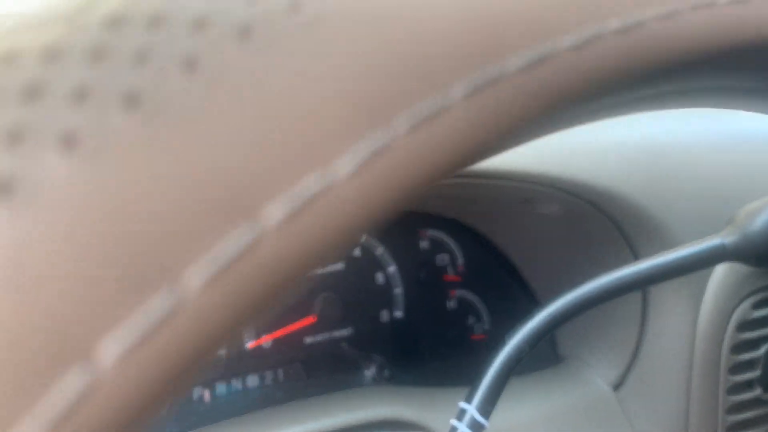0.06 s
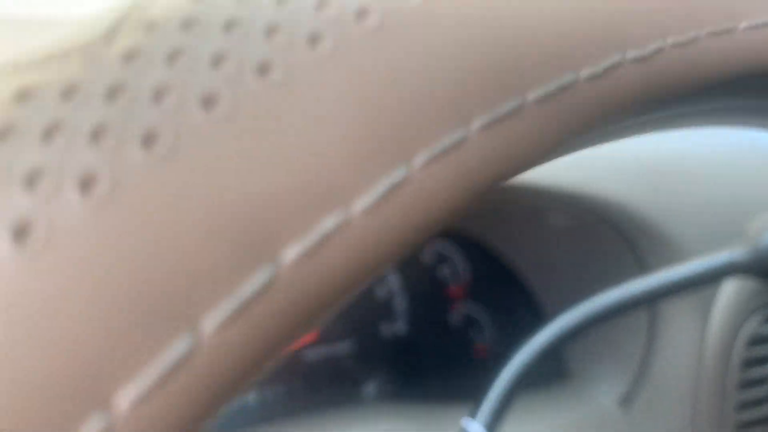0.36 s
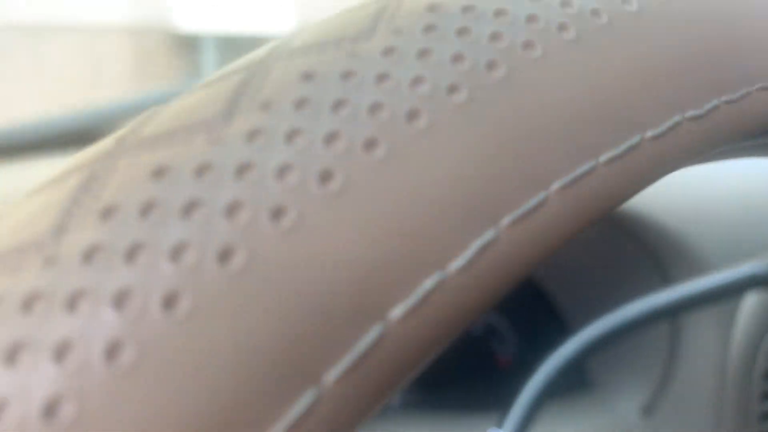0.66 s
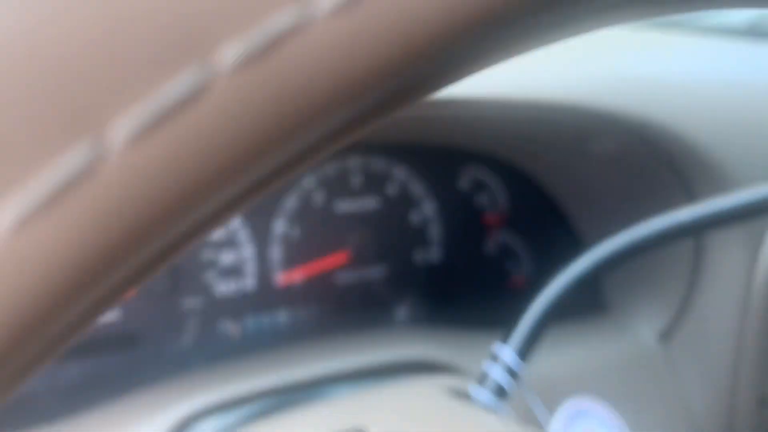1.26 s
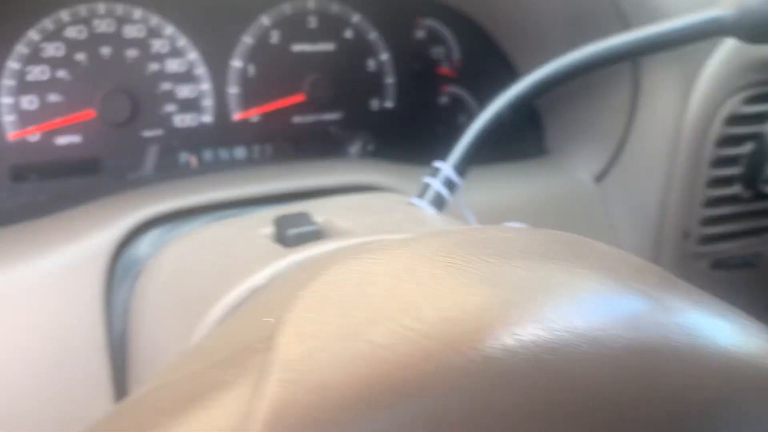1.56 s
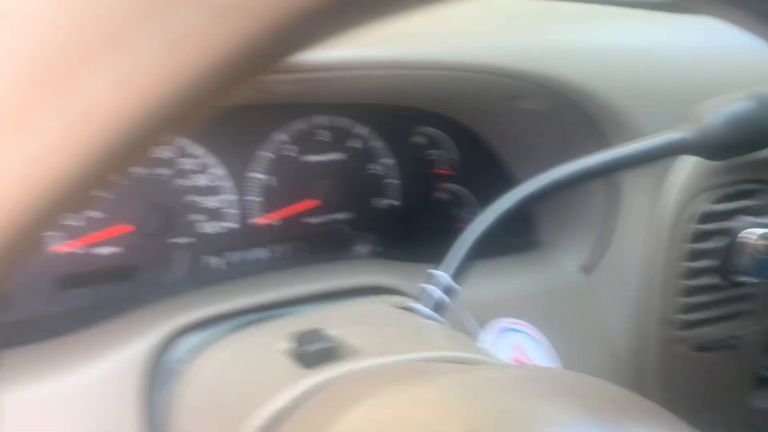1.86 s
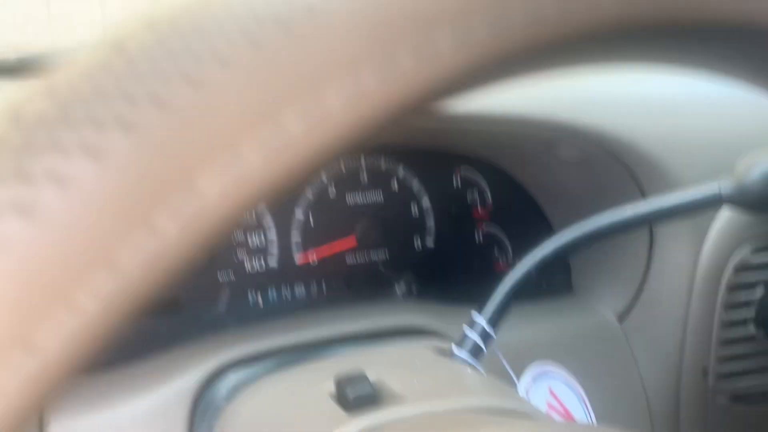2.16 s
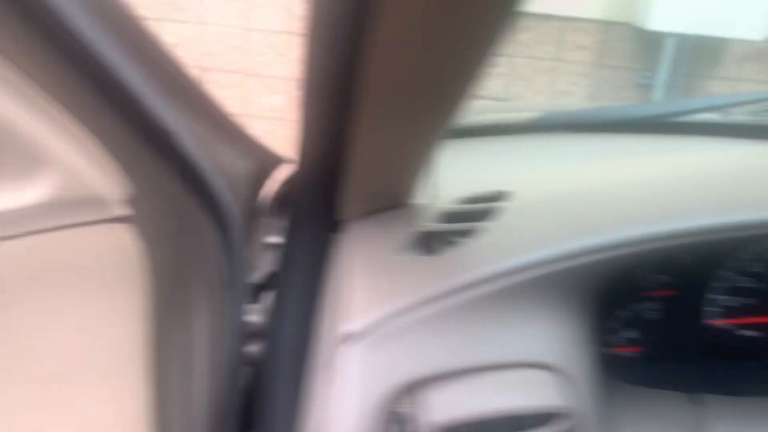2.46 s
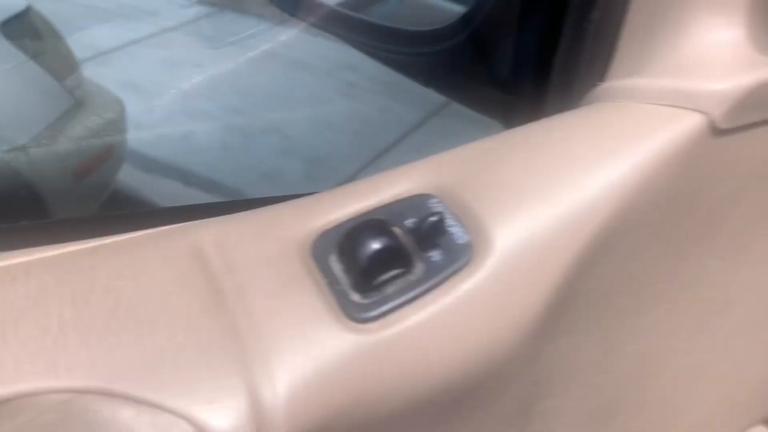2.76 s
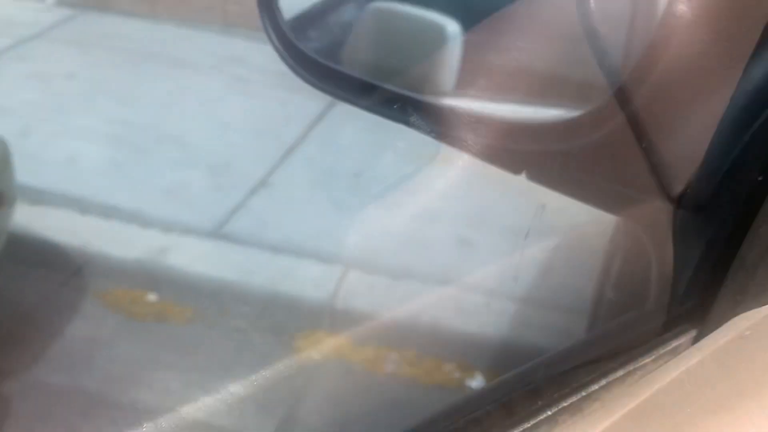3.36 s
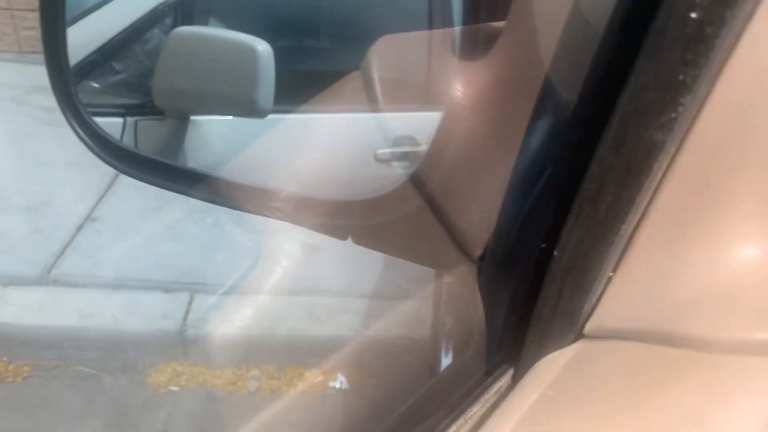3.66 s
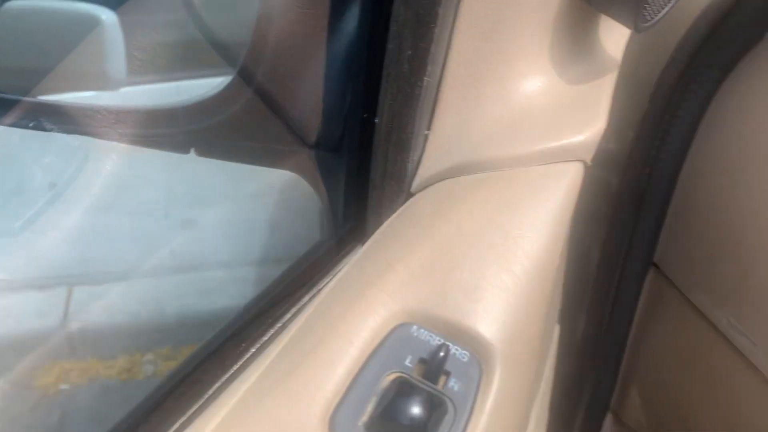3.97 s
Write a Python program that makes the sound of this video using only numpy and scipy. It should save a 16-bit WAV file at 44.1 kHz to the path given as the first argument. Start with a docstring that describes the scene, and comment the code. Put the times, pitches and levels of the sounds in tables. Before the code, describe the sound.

Power door locks clunk twice, close up inside a parked vehicle, the first with a brief springy ring. Light ticks, rubs and a creak come from plastic trim, while a low idle grows louder shortly before the second clunk.

```python
"""Power door locks clunk twice, heard on a stereo pair inside a parked vehicle: the first from across the
cabin, the second near the door. Each stroke is a quick run of metal contacts and a bolt hitting its stop, which
shakes the door panels; the first leaves a small spring ringing. Around them, handling brings light ticks, rubs
and a creak from the plastic trim. Behind it all a low idling rumble fills the cabin, louder and fuller from
about 2.3 s on, as the microphones near the side window."""
import sys
import numpy as np
from scipy import signal
from scipy.fft import rfft, irfft
from scipy.io import wavfile
from scipy.ndimage import uniform_filter1d

SR = 44100
rng = np.random.default_rng(int(sys.argv[2]) if len(sys.argv) > 2 else 0)


def wav_record(signal):
    """Record a signal, one row per channel, as 16-bit PCM in the file named by sys.argv[1]."""
    frames = np.transpose(np.atleast_2d(signal))
    bounded = np.clip(frames, -1, 1)
    # unit amplitude maps onto the largest positive 16-bit level
    quanta = np.round(bounded * 32767).astype(np.int16)
    wavfile.write(sys.argv[1], SR, quanta)


N = 176400
T = np.arange(N) / SR
HZ = np.maximum(np.arange(N // 2 + 1) * SR / N, 1)
SIDES = np.array([[1], [-1]])  # left, right
SHARED_ONLY = np.array([[1], [0]])  # sources have two rows: shared by both microphones, and opposed
LEAD_SAMPLES = 2048  # room for a scrape ahead of a contact
CUTOFF_HZ = 15800
LONGEST_T60_S = .18  # longest ring of a struck mode, keeping the pings short

# Contacts of the lock linkage: start_s, level_db, tilt_db_per_octave
FIRST_CONTACTS = [(1.1187, -21, 4.5), (1.1235, -16, 3.5), (1.128, -16.5, 0), (1.132, -20, -7.5),
                  (1.141, -28.5, -4), (1.162, -30, -3)]
SECOND_CONTACTS = [(2.8165, -24.5, -2), (2.8195, -18, -2.5), (2.8235, -26, -0.5), (2.8295, -22, 0),
                   (2.8335, -31.5, 4.5), (2.838, -24, -0.6), (2.8455, -21, 1), (2.853, -39.5, 5.5),
                   (2.863, -44.5, 7.5)]
# Spectrum of each stroke's contacts: frequency_hz, relative_db
FIRST_COLOUR = [(100, 7), (220, 2), (330, -9), (650, 7), (1000, -1.5), (1700, -1.5), (3200, -5),
                (4200, -13.5), (6700, -4.5), (8500, -10.5), (11500, -8), (15500, -19)]
SECOND_COLOUR = [(100, -2.5), (280, 14), (370, 12), (470, -5.5), (700, -8), (1050, -1.5), (1900, -5),
                 (3700, -7.5), (5200, -16.5), (6700, -6.5), (8200, -18.5), (10500, -6), (15500, -23)]
# The bolt hits its end stop and settles: start_s, level_db, tilt_db_per_octave (above 100 Hz)
FIRST_STOPS = [(1.1266, -3, 1), (1.1463, -22, 1.5)]
SECOND_STOPS = [(2.8171, -21, 7), (2.8255, -10.5, 3), (2.854, -2.5, -9.5)]
# Metal latch modes: pitch_hz, t60_s (capped at LONGEST_T60_S), first_stroke_db, second_stroke_db
LATCH_MODES = [(1247, 0.23, -7, -17), (1414, 0.095, -6.5, -22), (1534, 0.13, -14, -18),
               (1575, 0.17, -13, -30), (1720, 0.097, -10, -7), (1906, 0.15, -18.5, -12.5),
               (1923, .14, -6, -2), (2240, 0.41, -18.5, -12.5), (2560, 0.062, -6.5, 1),
               (2680, 0.1, -21.5, -11), (2870, .14, -11.5, -26), (2930, 0.12, -14.5, -13),
               (3100, 0.094, -23, -28), (3300, 0.1, -10, -34), (3440, 0.1, -13, -28),
               (3620, 0.1044, -22, -11), (3840, .13, -23.5, -12.5), (4600, 0.082, -23.5, -12),
               (6330, .13, -12.5, -12), (6790, .1, -9, -11)]
# Decay of the door's dense ring: frequency_hz, t60_s
DOOR_DECAY = [(100, 0.34), (400, 0.16), (1000, 0.21), (2500, .14), (6000, 0.093), (11000, 0.069),
              (16000, 0.1)]
# Door panel and cabin air modes: pitch_hz, t60_s, first_stroke_db, second_stroke_db
DOOR_MODES = [(51.8, 0.33, -2.5, -27), (83.1, 0.17, -0.5, -21), (106, 0.24, -11.5, -5.5),
              (123.7, 0.2, -15.5, -0.5), (195.2, 0.17, -9, 4.5), (228.7, 0.14, -9.5, -0.5),
              (313, 0.075, -15.5, -0.5), (345.4, .1, -26.5, -10.5), (421, 0.2, -22.5, -33),
              (422, .18, -27, -9.5), (471, 0.18, -14, -25), (572, 0.2, -21.5, -52), (634.4, 0.1, -3, -36),
              (682, 0.14, -23, -21), (750, 0.15, -15.5, -19), (851, 0.14, -19.5, -25),
              (967, 0.14, -27, -24.5), (1000, 0.13, -26.5, -11), (1123, 0.082, -26.5, -20.5)]
# Spectrum of the spring's shimmer: frequency_hz, relative_db
SPRING_COLOUR = [(6000, -21.5), (9500, 2.5), (11500, 5), (12500, -2.5), (13500, -16), (14800, 3.5),
                 (16000, -10.5)]
# The spring's lasting modes: pitch_hz, level_db, t60_s
SPRING_MODES = [(12550, -26, .13), (14590, -26.5, .265)]

# Knocks on plastic after a scrape: start_s, level_db, tilt_db_per_octave, swell_s, hollow_relative_db
TICKS = [(.063, -68, 25, 0.0017, -28.5), (.132, -57.5, 5.5, 0.0048, -18), (0.184, -32, -1.5, 0.0046, -19),
         (0.3574, -49.5, 3, .001, -17), (0.4525, -46.5, -2, .002, -7), (0.7406, -48, 3.5, 0.0013, -3),
         (0.825, -46.5, 1, 0.0019, 7), (0.906, -49, -0.5, .002, -3), (0.965, -45, -2, .003, -14),
         (0.994, -40.5, 1.5, .004, -13), (1.002, -35.5, 11.5, 0.0026, -3), (1.116, -36, 1.5, 0.01, -21),
         (1.3234, -46.5, -1.5, 0.0041, -12), (1.7373, -45.5, 1.5, 0.0075, -8.5),
         (1.758, -51, 1.5, .008, -6), (1.8235, -59, 1, .001, -10), (1.8823, -46.5, 1, 0.0016, 3),
         (1.9277, -50, 2.5, 0.0034, 1), (1.951, -35.5, 0, .0015, 1), (1.966, -48, 2, 0.0026, -11.5),
         (1.986, -47.5, -1.5, .005, -0.5), (2.5685, -51, 1.5, .002, -16), (2.795, -43, 2, 0.0033, -11),
         (2.811, -33, 3, 0.015, -15), (3.0977, -49, 16, .005, -19.5), (3.1411, -44, 5.5, 0.0046, 8),
         (3.1451, -29.5, -2, 0.004, -3.5), (3.8838, -39, 3, .004, -17), (3.9221, -37.5, 5, 0.001, -22)]
# Stiff trim snapping over: start_s, pitch_hz, level_db
SNAPS = [(0.185, 2070, -29), (1.9526, 2260, -21), (3.1448, 2800, -18)]
# Plastic trim modes: pitch_hz, t60_s, knock_db, slip_db
TRIM_MODES = [(1430, 0.068, -7, -5), (2085, 0.076, -3, -10), (2400, 0.043, 2.5, 3), (2730, 0.05, -6, -14),
              (3300, .05, -17, -6), (3650, .05, -12.5, -2), (5240, .04, -21.5, -27)]
# Modes of the hollow panel behind the trim: pitch_hz, t60_s, relative_db
HOLLOW_MODES = [(208, 0.1, 5), (580, 0.044, -2.5), (860, 0.042, -1), (1090, .05, -4), (1250, .05, -6.5),
                (1667, 0.036, -5.5)]
# Decay of a tick and of one slip of the creak: frequency_hz, t60_s
TICK_DECAY = [(500, .08), (3000, .065), (14000, .045)]
SLIP_DECAY = [(500, 0.07), (3000, 0.2), (14000, 0.06)]
# Spells of rubbing, one list each: time_s, level_db
RUSTLE_SPELLS = [
    [(0, -92), (.1, -82), (.2, -67.5), (.33, -79), (.42, -91), (.58, -65.5), (.72, -66), (.8, -70.5),
     (.94, -63.5), (1.02, -60.5), (1.08, -89.5)],
    [(1.72, -80), (1.745, -62), (1.8, -88), (1.87, -74.5), (1.91, -84), (1.955, -68), (2, -80)],
    [(2.88, -55.5), (3.01, -61), (3.12, -53), (3.2, -64), (3.36, -77), (3.39, -58.5), (3.55, -58.5),
     (3.71, -64), (3.79, -60), (3.86, -50), (3.93, -59), (4, -68.5)],
]
# Dull rubs on the trim: middle_s, half_length_s, level_db
SCUFFS = [(0.633, 0.09, -48.5), (0.857, 0.067, -52), (.997, 0.022, -38), (1.885, .035, -47),
          (1.981, 0.017, -44)]
# Spectra of the handling sounds: frequency_hz, relative_db
TICK_COLOUR = [(300, 18), (900, -2.5), (1600, -2.5), (2500, 0.5), (3500, -3.5), (5500, -10), (8000, -17.5),
               (11000, -20), (15500, -27)]
CREAK_COLOUR = [(500, -14), (1450, 5.5), (1900, -3), (2450, -3), (3000, 0), (3600, -11), (4500, -3),
                (6500, -8), (8000, -24), (11000, -14), (15500, -14)]
RUSTLE_COLOUR = [(1200, -1.5), (2400, -2.5), (4000, 1.5), (6000, -1), (8000, 1), (10000, 0.5), (12500, 1),
                 (15500, -1.5)]
SCUFF_COLOUR = [(150, -23), (400, -6), (650, 6.5), (1200, -4.5), (1700, -7.5), (2500, -15.5), (4500, -18),
                (7000, -34.5), (15500, -49)]

# Spectrum of the idle in the cabin and close to the side window: frequency_hz, relative_db
CABIN_COLOUR = [(20, -27.5), (32, -26.5), (43, -3.5), (65, 2), (90, -4.5), (125, -13), (180, -6.5),
                (260, -8.5), (340, -15.5), (500, -19), (850, -19.5), (1100, -22.5), (1250, -32),
                (1520, -26), (2200, -38.5), (3500, -53), (7000, -66.5), (15500, -69.5)]
WINDOW_COLOUR = [(25, -14), (48, 1), (100, 1), (140, -5.5), (250, 3), (310, -4), (420, -3.5), (540, -6),
                 (700, -13), (950, -10.5), (1270, -17.5), (1400, -25.5), (2500, -35.5), (4000, -49.5),
                 (8000, -62.5), (15500, -60.5)]
# Hums in the same two places: pitch_hz, waver_bandwidth_hz, level_db
CABIN_HUMS = [(70.9, 6.2, -46), (175, 17, -39.5)]
WINDOW_HUMS = [(80.8, 1.2, -29), (227.4, 21, -33), (338, 2.8, -39), (373.2, 4.3, -45), (415, 1.1, -41),
               (622.6, 4, -48)]
# Rumbles and window hums as the microphones move: time_s, gain_db
CABIN_LEVEL = [(0, -33), (.6, -32), (1.5, -33), (2.1, -30.5), (2.7, -34.5), (4, -38)]
WINDOW_LEVEL = [(0, -69.5), (2.1, -67), (2.35, -36), (2.55, -27.5), (2.8, -27.5), (3.2, -27), (3.55, -25),
                (3.8, -28), (4, -26.5)]
WINDOW_HUM_LEVEL = [(0, -13), (2.4, -18), (2.9, -0.5), (3.25, -2), (3.5, 1.5), (3.8, 0), (4, 3.5)]
# Likeness of the two microphones: frequency_hz, correlation
PAIR_LIKENESS = [(60, 0.95), (150, 0.86), (260, 0.74), (400, 0.061), (650, 0.058), (2000, 0.085),
                 (4500, 0.15), (6500, 0.22), (8000, 1), (15000, 1)]
# Balance of the pair: frequency_hz, left_minus_right_db
PAIR_BALANCE = [(50, -1), (250, -0.5), (550, 2), (1000, 2.5), (2500, 0), (4000, -2), (5400, -3), (7500, 0),
                (15000, 0.5)]


def lock_stroke(contacts, colour, stops, column):
    """The linkage rattles, each contact rings the latch, and the bolt thuds into its stop."""
    out = door_panels(stops, column)
    for start_s, db, tilt_db in contacts:
        add(out, start_s - LEAD_SAMPLES / SR, contact(db + 7, tilt_db, colour, DOOR_DECAY, -.5, bands=14))
        add(out, start_s, struck(LATCH_MODES, db - 3.5, column))
    return out


def door_panels(stops, column):
    """Each thud sets the door and the cabin air ringing; low modes build up more slowly."""
    out, t = np.zeros((2, N)), np.arange(SR // 2) / SR
    for hz, t60, *stroke_db in DOOR_MODES:
        rise_s = .011 * np.sqrt(100 / hz)
        mode = from_db(stroke_db[column]) * ring_envelope(t, t60, rise_s) * np.sin(2 * np.pi * hz * t)
        angle = rng.uniform(-np.pi, np.pi) * np.clip((hz - 250) / 400, 0, 1)  # the bass stays central
        octaves = max(np.log2(hz / 100), 0)
        for start_s, db, tilt_db in stops:
            add(out, start_s, from_db(db + tilt_db * octaves) * from_direction(mode, angle))
    return out


def spring(start_s=1.161, rise_s=.006):
    """A small spring shimmers after the first stroke and rings on in two high modes."""
    t = np.maximum(T - start_s, 0)
    hiss = coloured(rng.standard_normal((2, N)), [(2000, -58)] + SPRING_COLOUR)
    shimmer = from_db(-24.5) * ring_envelope(t, .1, rise_s) * hiss
    tones = sum(from_db(db) * ring_envelope(t, t60, rise_s) * np.sin(2 * np.pi * hz * T)
                for hz, db, t60 in SPRING_MODES)
    return shimmer + tones * SHARED_ONLY


def trim_ticks(snap_t60_s=.011):
    """Light knocks ring the plastic trim and the hollow behind it; stiff pieces snap over."""
    out = np.zeros((2, N))
    for start_s, db, tilt_db, swell_s, hollow_db in TICKS:
        add(out, start_s, struck(HOLLOW_MODES, db + hollow_db))
        knock = contact(db + 7.5, tilt_db, TICK_COLOUR, TICK_DECAY, swell_s=swell_s)
        add(out, start_s - LEAD_SAMPLES / SR, knock)
        add(out, start_s, struck(TRIM_MODES, db - 7 - 3.5 * tilt_db))  # brighter knocks ring less
    for start_s, hz, db in SNAPS:
        add(out, start_s, struck([(hz, snap_t60_s, 0)], db))
    return out


def trim_creak(start_s=.205, end_s=.325, gap_s=.0075, db=-49):
    """The trim creaks once, in a run of uneven slips."""
    out = np.zeros((2, N))
    for k, jitter in enumerate(rng.uniform(-.4, .4, 18)):
        slip_s = start_s + (k + jitter) * gap_s
        slip = contact(db, tilt_db=-1, colour=CREAK_COLOUR, decay=SLIP_DECAY)
        ring = struck(TRIM_MODES, db, column=1)
        if slip_s < end_s:
            add(out, slip_s - LEAD_SAMPLES / SR, slip)
            add(out, slip_s, ring)
    return out


def rustle(catches_per_s=400, grain_s=.002, fade_db_per_s=194):
    """Spells of rubbing: a soft hiss with tiny catches in it."""
    catches = (rng.random(N) < catches_per_s / SR) * np.minimum(rng.exponential(1, N), 4)
    grains = rms_one(signal.lfilter([1], [1, -np.exp(-1 / (grain_s * SR))], catches))
    friction = rng.standard_normal((2, N)) * (1 + from_db(-10.5) * grains)
    effort = 0
    for spell in RUSTLE_SPELLS:
        outside_s = abs(T - np.clip(T, spell[0][0], spell[-1][0]))
        effort += level(spell) * from_db(-fade_db_per_s * outside_s)
    return from_db(4.5) * effort * coloured(friction, [(300, -24.5)] + RUSTLE_COLOUR)


def scuffs(slips_per_s=1300):
    """Dull rubs over the hollow trim: dense little slips that swell and fade."""
    pressure = sum(from_db(db) * np.exp(-.5 * ((T - s) / half_s) ** 2) for s, half_s, db in SCUFFS)
    slips = (rng.random(N) < slips_per_s / SR) * rng.standard_normal((2, N))
    return pressure * coloured(slips, SCUFF_COLOUR)


def idle_rumble():
    """The idle fills the cabin and sounds fuller once the microphones are near the side window."""
    cabin = level(CABIN_LEVEL) * coloured(rng.standard_normal((2, N)), CABIN_COLOUR) + hums(CABIN_HUMS)
    window = level(WINDOW_LEVEL) * coloured(rng.standard_normal((2, N)), WINDOW_COLOUR)
    return cabin + window + level(WINDOW_HUM_LEVEL) * hums(WINDOW_HUMS)


def hums(rows):
    """Narrow drones in the rumble that waver in pitch and strength."""
    out = 0
    for hz, width_hz, db in rows:
        slow_spectrum = rfft(rng.standard_normal((2, N))) / (1 + (HZ / width_hz) ** 2)
        swell, drift = rms_one(irfft(slow_spectrum, N))
        out += from_db(db) * rms_one((1 + .2 * swell) * np.sin(2 * np.pi * hz * T + .56 * drift))
    return out * SHARED_ONLY


def cabin_reflections(x, step_hz=10, width_hz=24.3):
    """Glass and trim near the microphones carve fine peaks and dips into the middle and the treble."""
    grid_hz = np.arange(0, SR / 2, step_hz)
    ripple = signal.lfilter([1], [1, -np.exp(-step_hz / width_hz)], rng.standard_normal(len(grid_hz)))
    ripple = rms_one(uniform_filter1d(ripple, size=4))
    ripple = np.minimum(np.interp(HZ, grid_hz, ripple), 1)
    depth_db = 4 * np.minimum(HZ / 810, 1)
    offset_db = depth_db ** 2 * np.log(10) / 20  # turned down where the ripple is deep
    return irfft(rfft(x) * from_db(depth_db * ripple - offset_db), N)


def microphones(parts, lag_s=.00021, lag_from_hz=6050):
    """The stereo pair: alike in the bass, diffuse in the middle, late on the left in the treble."""
    shared, opposed = rfft(parts)
    alike = np.clip(at_hz(PAIR_LIKENESS, HZ), -.99, .99)
    pair = np.sqrt((1 + alike) / 2) * shared + SIDES * np.sqrt((1 - alike) / 2) * opposed
    balance = from_db(SIDES * at_hz(PAIR_BALANCE, HZ) / 2)
    lag_rad = 2 * np.pi * lag_s * np.maximum(HZ - lag_from_hz, 0)
    return irfft(pair * balance * np.exp(-.5j * SIDES * lag_rad), N)


def contact(db, tilt_db, colour, decay, crack_db=2, swell_s=0, bands=5, size=12288):
    """Two parts meet: an optional swelling scrape, a crack, then a dense ring that dies band by band."""
    t = (np.arange(size) - LEAD_SAMPLES) / SR
    hz = np.maximum(np.arange(size // 2 + 1) * SR / size, 1)
    shape = from_db(at_hz(colour, hz) + tilt_db * np.log2(np.maximum(hz, 400)))
    shape *= (hz < CUTOFF_HZ) * hz ** 2 / (hz ** 2 + 70 ** 2)  # bass rolls off below 70 Hz
    spectrum = rfft(rms_one(irfft(rfft(rng.standard_normal((2, size))) * shape)))
    centres_hz, ring = np.geomspace(100, 16000, bands), 0
    for centre_hz, share in zip(centres_hz, np.eye(bands)):
        band = irfft(spectrum * np.interp(hz, centres_hz, share))
        ring += band * from_db(-60 * np.maximum(t, 0) / at_hz(decay, centre_hz))
    scrape = np.where(t < 0, from_db(-8), 1) * np.exp(np.minimum(t, 0) / max(swell_s, 1 / SR))
    crack = 1 + from_db(crack_db) * np.exp(-abs(t) / .0025)
    return from_db(db) * ring * scrape * crack / 2


def struck(modes, db, column=0, spread_db=5.5, size=12288):
    """One blow on a small part; each mode arrives with its own random strength and direction."""
    t, out = np.arange(size) / SR, 0
    for (hz, t60, *mode_db), (spread, turn) in zip(modes, rng.standard_normal((len(modes), 2))):
        envelope = from_db(db + mode_db[column] + spread_db * spread - 60 * t / min(t60, LONGEST_T60_S))
        out += from_direction(envelope * np.sin(2 * np.pi * hz * t), np.pi * turn)
    return out


def from_direction(x, angle):
    """Split a sound into its shared and opposed rows."""
    return np.outer([np.cos(angle), np.sin(angle)], x)


def ring_envelope(t, t60, rise_s):
    """A vibration builds up and dies away."""
    return (1 - np.exp(-t / rise_s)) * from_db(-60 * t / t60)


def from_db(db):
    """Decibels to gain."""
    return 10 ** (np.asarray(db) / 20)


def rms_one(x):
    """Scale to unit power."""
    return x / np.sqrt(np.mean(x ** 2) + 1e-20)


def at_hz(points, hz):
    """Read a table on a log-frequency axis."""
    frequencies, values = np.transpose(points)
    return np.interp(np.log(hz), np.log(frequencies), values)


def level(rows):
    """Gain over time from rows of time_s, level_db."""
    return from_db(np.interp(T, *np.transpose(rows)))


def coloured(x, colour):
    """Give a steady signal a spectrum, at unit power."""
    return rms_one(irfft(rfft(x) * from_db(at_hz(colour, HZ)), N))


def add(out, start_s, x):
    """Mix a short sound in at a time."""
    i = int(start_s * SR)
    out[..., i:i + x.shape[-1]] += x[..., :N - i]


def scene():
    """From inside the cabin: two lock strokes in front, handling around them, the idle behind."""
    first = microphones(lock_stroke(FIRST_CONTACTS, FIRST_COLOUR, FIRST_STOPS, column=0) + spring())
    first *= from_db(-SIDES)  # 2 dB towards the right
    second = microphones(lock_stroke(SECOND_CONTACTS, SECOND_COLOUR, SECOND_STOPS, column=1))
    trim = trim_ticks() + trim_creak()
    background = cabin_reflections(rustle() + scuffs() + idle_rumble())
    edge_fade = np.clip(np.minimum(T, T[-1] - T) / .003, 0, 1)
    return first + second + microphones(trim + edge_fade * background)


def record(dry):
    """The deepest bass is thinned, peaks stop at full scale and the top is cut."""
    low_cut = signal.butter(2, 28, "high", fs=SR, output="sos")
    high_cut = signal.ellip(10, .1, 80, CUTOFF_HZ, fs=SR, output="sos")
    return signal.sosfilt(high_cut, np.clip(signal.sosfilt(low_cut, dry), -1, 1))


dry = scene()
out = record(dry)
wav_record(out)
```